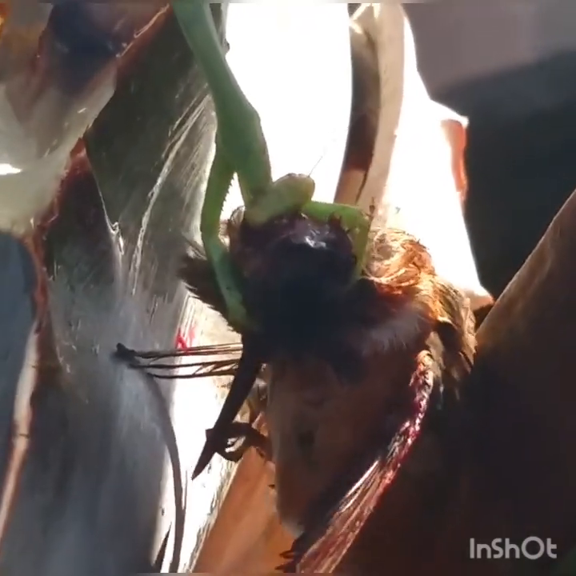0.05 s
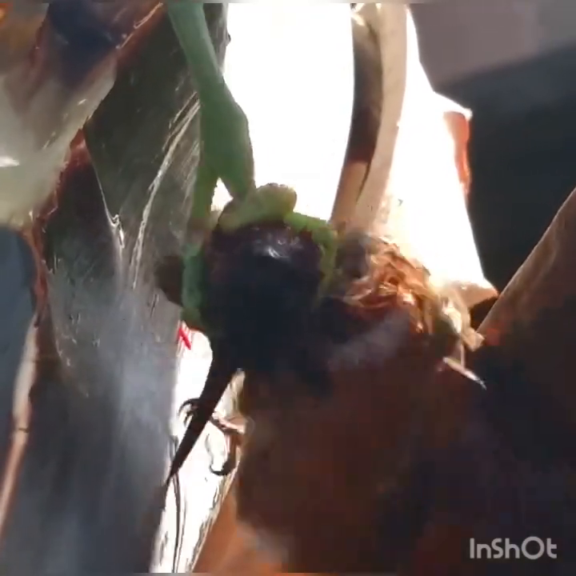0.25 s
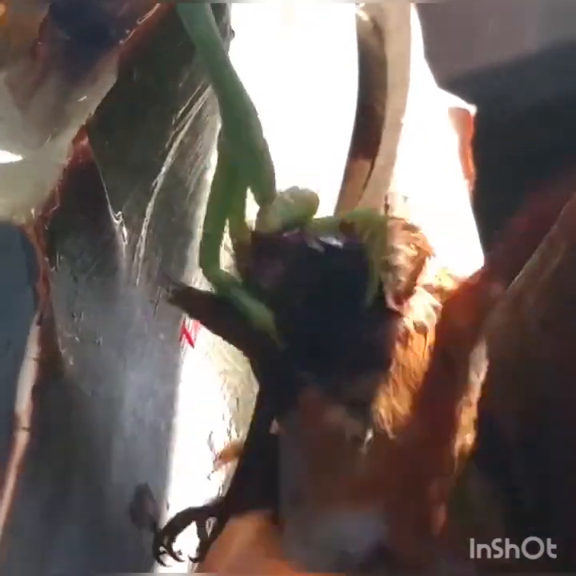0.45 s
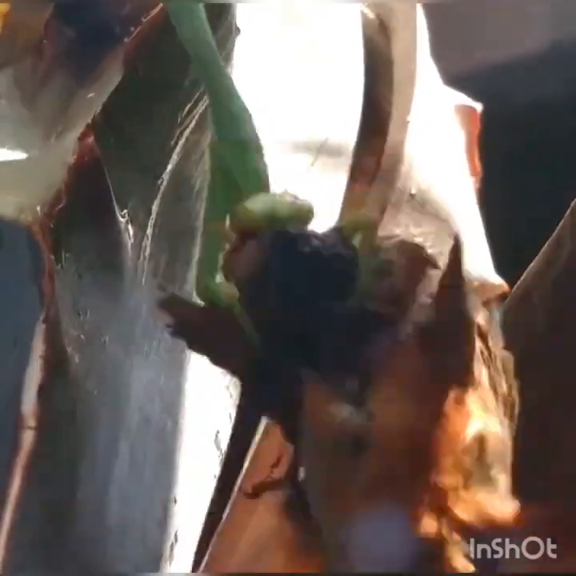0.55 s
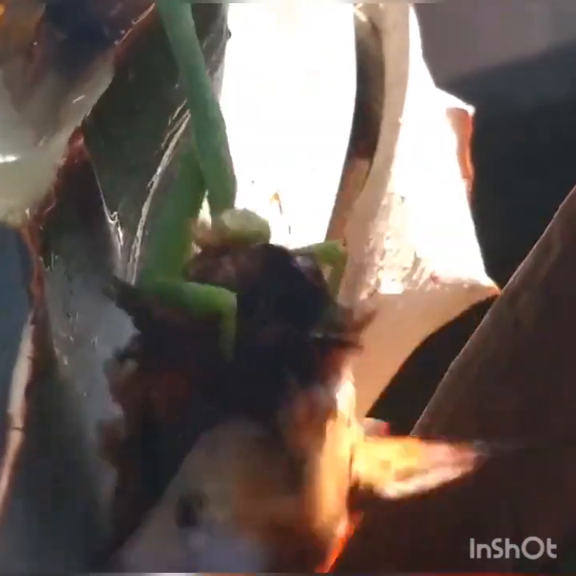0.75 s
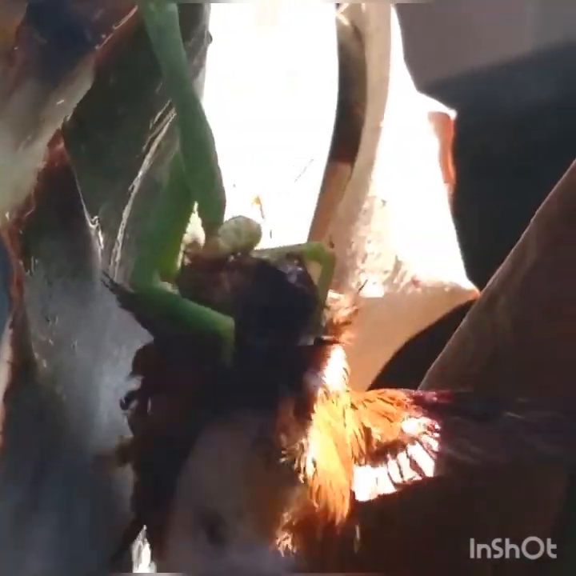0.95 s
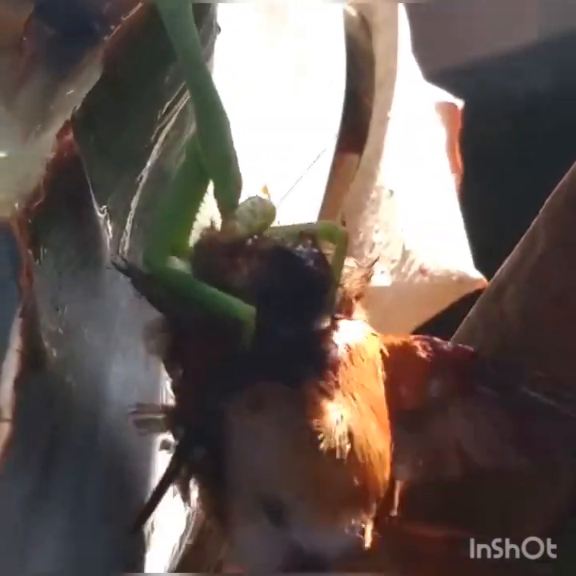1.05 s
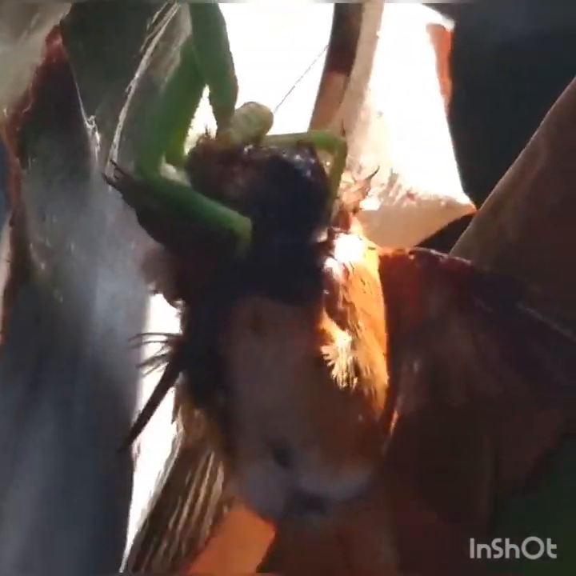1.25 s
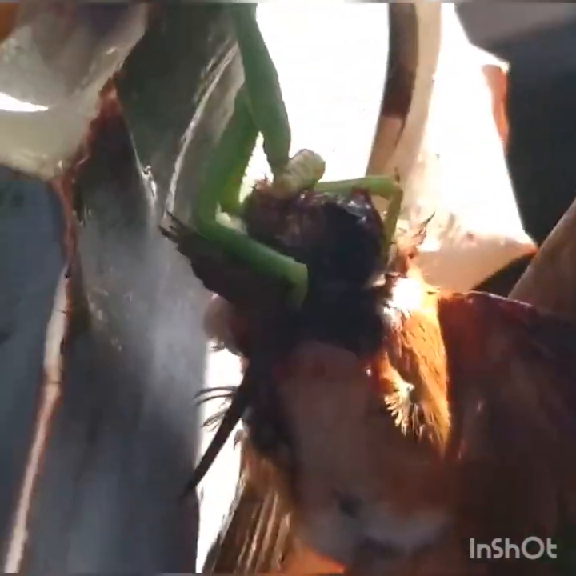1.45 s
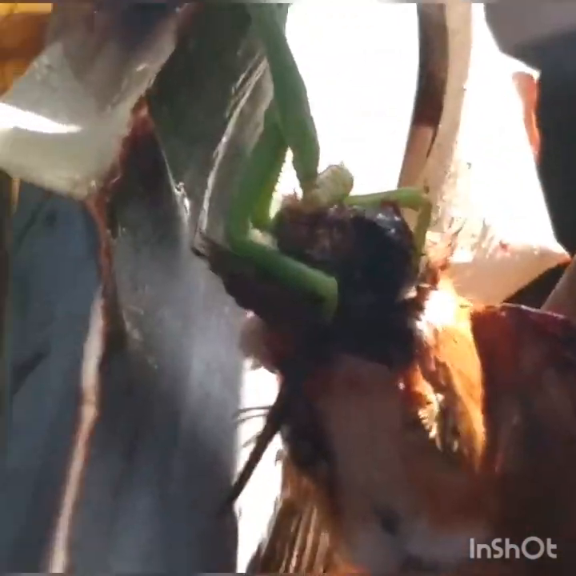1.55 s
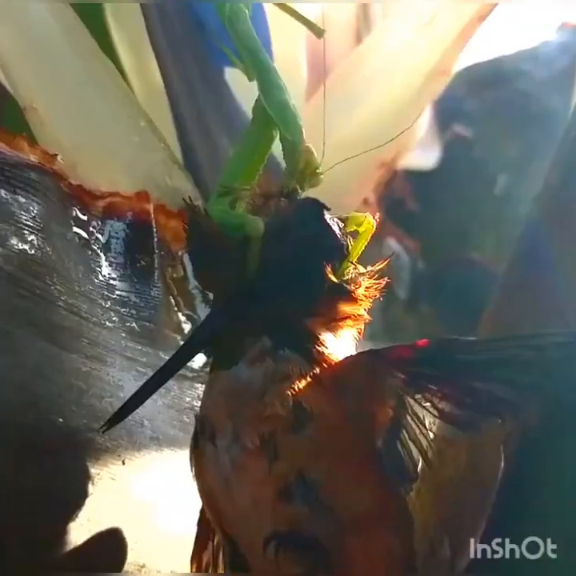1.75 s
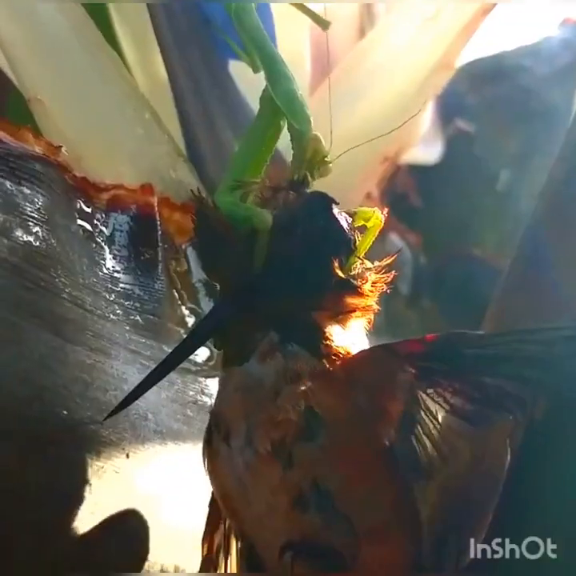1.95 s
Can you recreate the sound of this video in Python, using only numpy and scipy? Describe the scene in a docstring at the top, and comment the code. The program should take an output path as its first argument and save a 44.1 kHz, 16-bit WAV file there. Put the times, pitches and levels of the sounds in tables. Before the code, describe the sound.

Close up in a garden, wings beat against a plant in a rattling burst, and the struggling bird squeals once. After a pause come a few small leaf taps and a brief scrape, with faint traffic and birdsong far behind.

```python
"""In a garden, close by, a small bird held by a mantis thrashes its wings against stiff leaves.
Feathers slap, snap and rustle, the leaves knock back, the wingbeats push air, and the bird squeals once.
Then it goes still and a leaf ticks a few times as clicks run along it, with a soft rub and a scrape.
Behind are outdoor air, far traffic, a low hum, a thin whine and a distant songbird."""
import sys
import numpy as np
from scipy import signal
from scipy.fft import rfft, irfft
from scipy.io import wavfile

SR = 44100
rng = np.random.default_rng(int(sys.argv[2]) if len(sys.argv) > 2 else 0)


def unload_wav(signal):
    """Save mono or channel-first audio to the path in sys.argv[1] as 16-bit WAV at rate SR, clipped to [-1, 1]."""
    wavfile.write(
        sys.argv[1],
        SR,
        np.round(np.clip(np.atleast_2d(signal).T, -1, 1) * 32767).astype(np.int16),
    )


N = 88200
TIME_S = np.arange(N) / SR
HIT_SIZE, HIT_LEAD = 2048, 512  # samples: a hit's buffer, and the lead-in to its peak


def from_db(db):
    """Decibels to gain."""
    return 10 ** (np.asarray(db) / 20)


def unit_rms(x):
    """Scale to unit rms."""
    return x / np.sqrt(np.mean(x ** 2) + 1e-20)


def curve(rows, column=1):
    """One column of a breakpoint curve at every sample."""
    rows = np.array(rows)
    return np.interp(TIME_S, rows[:, 0], rows[:, column])


def gesture(rows, column=1):
    """Gain from a dB curve, silent outside it."""
    return from_db(curve(rows, column)) * (TIME_S > rows[0][0]) * (TIME_S < rows[-1][0])


def bins(size):
    """Frequencies of a spectrum, floored at 1 Hz."""
    return np.maximum(np.fft.rfftfreq(size, 1 / SR), 1)


def at_hz(points, hz):
    """Read a table on a log-frequency axis."""
    points = np.array(points)
    return np.interp(np.log(hz), np.log(points[:, 0]), points[:, 1])


def colour(x, eq, tilt=0):
    """Minimum-phase EQ with a tilt in dB per octave, rolling off below its first point."""
    size = x.shape[-1]
    hz, lowest_hz = bins(size), eq[0][0]
    octaves = np.log2(np.maximum(hz, lowest_hz) / 1000)
    low_cut = np.minimum(hz / lowest_hz + .01, 1)
    gain = from_db(at_hz(eq, hz) + tilt * octaves) * low_cut
    cepstrum = irfft(np.log(gain), size)
    cepstrum[1:size // 2] *= 2  # folded so that ringing follows the attack
    cepstrum[size // 2 + 1:] = 0
    return irfft(rfft(x) * np.exp(rfft(cepstrum)), size)


def drift(rate_hz):
    """Random wander with unit spread, mostly slower than the given rate."""
    return unit_rms(irfft(rfft(rng.standard_normal(N)) / (1 + (bins(N) / rate_hz) ** 2), N))


def stereo(pair, width):
    """Mid and side to left and right, the side scaled by a width table."""
    mid, side = pair
    side = irfft(rfft(side) * at_hz(width, bins(len(mid))), len(mid))
    return np.array([mid + side, mid - side])


def noise(eq, width):
    """Smooth stereo noise of a given colour and width."""
    return unit_rms(stereo(colour(rng.standard_normal((2, N)), eq), width))


def place(out, start_s, hit, level_db):
    """Mix in a hit with the energy of 4 ms at the given level."""
    start = int(start_s * SR) - HIT_LEAD
    energy = np.mean(np.sum(hit ** 2, axis=-1))
    out[:, start:start + HIT_SIZE] += hit * from_db(level_db) * np.sqrt(.004 * SR / energy)


# stereo spread of the ambience: freq_hz, side_over_mid
AIR_WIDTH = [(200, .004), (450, 0.052), (1000, 0.068), (1800, 0.2), (4000, 0.6), (8000, .85), (15000, 0.58)]
# tone of the air bed and of the wind puff: freq_hz, gain_db
AIR_EQ = [(15, -64), (25, -36.5), (43, -14), (72, -8.5), (145, 2), (175, -7), (242, -6.5), (326, -11.5),
          (384, -14.5), (624, -20), (863, -17.5), (1160, -22.5), (2350, -32), (3920, -34.5), (5730, -38.5),
          (14800, -39), (16000, -45.5)]
PUFF_EQ = [(25, -4.5), (65, 17), (110, -17), (300, -62)]
# their fader rides: time_s, level_db
AIR_LEVEL = [(0, -61.5), (.9, -61.5), (1.4, -62.5), (1.65, -61.5), (1.78, -64), (2, -63)]
PUFF_LEVEL = [(1.29, -68), (1.335, -57.5), (1.375, -87.5)]

def outdoor_air():
    """A bed of open air with one low puff of wind."""
    bed = noise(AIR_EQ, AIR_WIDTH) * from_db(curve(AIR_LEVEL))
    return bed + noise(PUFF_EQ, AIR_WIDTH) * gesture(PUFF_LEVEL)


# tone of far tyres: freq_hz, gain_db
TRAFFIC_EQ = [(300, -13.5), (700, -10), (870, 2.5), (1100, -17.5), (2000, -27), (5000, -52)]
# traffic swells: time_s, level_db
TRAFFIC_LEVEL = [(0, -74), (.6, -60.5), (1.0, -67.5), (1.16, -63), (1.48, -65.5), (1.65, -70), (1.8, -86),
                 (2, -90)]

def traffic():
    """Far tyre noise swells and fades."""
    return noise(TRAFFIC_EQ, AIR_WIDTH) * from_db(curve(TRAFFIC_LEVEL))


# fader ride of the hum: time_s, level_db
HUM_LEVEL = [(0, -64), (.2, -63.5), (1.1, -66.5), (1.5, -64), (1.75, -81), (2, -70.5)]

def hum(pitch_hz=77.2, third_db=-2.5):
    """A low tone and its third harmonic, each wavering in level and phase."""
    tone = np.zeros(N)
    for harmonic, db in ((1, 0), (3, third_db)):
        gain = from_db(db + 2.5 * drift(5))
        tone += gain * np.sin(2 * np.pi * harmonic * pitch_hz * TIME_S + .5 * drift(3))
    return tone * from_db(curve(HUM_LEVEL))


# fader ride of the whine: time_s, level_db
WHINE_LEVEL = [(.7, -92), (.83, -77), (1.0, -81.5), (1.17, -76), (1.22, -82), (1.31, -86), (1.38, -86)]

def whine(pitch_hz=4440):
    """One thin, unsteady high tone."""
    gain = gesture(WHINE_LEVEL) * from_db(2 * drift(13))
    return gain * np.sin(2 * np.pi * pitch_hz * TIME_S + .45 * drift(24))


# song notes: start_s, length_s, start_hz, end_hz, arch_hz, prefader_db
CHIRPS = [(1.027, 0.034, 3810, 3700, 140, -66.5), (1.483, 0.053, 4200, 3750, 197, -71),
          (1.57, 0.038, 3880, 3200, 2.6, -72.5), (1.68, 0.016, 4200, 5020, 0.52, -68.5),
          (1.694, 0.029, 4090, 3910, 7.5, -69.5), (1.757, 0.06, 2900, 3216, 89, -68.5),
          (1.875, 0.046, 3196, 3300, 840, -69.5)]

def songbird(warble_hz=110):
    """Faint whistles that glide along an arch with a fast random warble."""
    out = np.zeros(N)
    for start_s, length_s, start_hz, end_hz, arch_hz, db in CHIRPS:
        progress = np.clip((TIME_S - start_s) / length_s, 0, 1)
        arch = np.sin(np.pi * progress)
        hz = start_hz + (end_hz - start_hz) * progress + arch_hz * arch + warble_hz * drift(337)
        out += from_db(db) * np.sqrt(2 * np.abs(arch)) * np.sin(2 * np.pi * np.cumsum(hz) / SR)
    return out


def garden_reverb(x, t60_s=.45, predelay_s=.004, lowpass_hz=4000):
    """Scattered, dulled reflections from foliage and walls."""
    t = np.arange(SR // 2) / SR
    tail = stereo(rng.standard_normal((2, len(t))), AIR_WIDTH)
    tail *= from_db(-60 * t / t60_s) * (t > predelay_s)
    tail /= np.sqrt(np.sum(tail ** 2) / 2)
    tail = signal.sosfilt(signal.butter(1, lowpass_hz, fs=SR, output="sos"), tail)
    return signal.fftconvolve(x * np.ones((2, 1)), tail, axes=1)[:, :N]


# microphone channel imbalance on the ticks and the squeal: freq_hz, side_over_mid
MIC_IMBALANCE = [(500, .02), (1200, 0.048), (1900, 0.2), (3000, 0.087), (6000, .05)]

def mic_imbalance(x):
    """Unequal microphone channels make the left louder, mostly near 1.9 kHz."""
    return stereo((x, x), MIC_IMBALANCE)


# stereo spread of the close textures: freq_hz, side_over_mid
GRAIN_WIDTH = [(500, .03), (1300, .06), (1850, 0.13), (2700, .07), (4300, 0.11), (7000, .3), (13000, 0.47)]

def grains(size, spread_db=7):
    """Dense tiny clicks of uneven strength as barbs, leaf or claw slip."""
    clicks = rng.standard_normal((2, size))
    strength = from_db(spread_db * np.clip(rng.standard_normal(size), -2, 2))
    return stereo(clicks * strength, GRAIN_WIDTH)


# tone of the claw and of the shifting leaf: freq_hz, gain_db
SCRAPE_EQ = [(800, -9.5), (2000, -2), (3000, -4), (5000, -7), (7000, -22.5), (16000, -22)]
RUB_EQ = [(600, -11), (1000, 6), (1350, -6.5), (1850, 0.5), (2600, -15), (3800, -6), (6000, -22),
          (12000, -28)]
# their envelopes: time_s, level_db
SCRAPE_LEVEL = [(1.419, -55), (1.423, -53.5), (1.429, -50.5), (1.436, -61.5), (1.452, -89)]
RUB_LEVEL = [(1.22, -77), (1.262, -66), (1.305, -65), (1.35, -90), (1.39, -70), (1.425, -62), (1.47, -65.5),
             (1.53, -79), (1.62, -72), (1.72, -80)]

def leaf_friction():
    """A claw scrapes on after one tick, and the leaf rubs softly as it shifts."""
    scrape = unit_rms(colour(grains(N), SCRAPE_EQ)) * gesture(SCRAPE_LEVEL)
    rub = unit_rms(colour(grains(N), RUB_EQ)) * gesture(RUB_LEVEL)
    return scrape + rub


# tick cues: start_s, level_db, tilt_db_per_octave, edge_echo_s
TICKS = [(1.2533, -36.5, 0, .00069), (1.2871, -54, 3, 0.00049), (1.4184, -38, 2, 0.000777),
         (1.596, -63, 16.5, 0.00027)]
# tone of a tick: freq_hz, gain_db
TICK_EQ = [(300, -14.5), (600, -12.5), (920, 0), (1330, -6), (1950, 3), (2700, -4), (3600, -8),
           (5500, -23.5), (8000, -38), (16000, -64)]

def leaf_ticks(travel_at_1khz_s=.001304, front_hz=4968, echo_gain=.75):
    """A click runs along the leaf as a bending wave, highs first, and returns inverted from the edge."""
    out, hz = np.zeros((2, N)), bins(HIT_SIZE)
    lag_s = travel_at_1khz_s * np.maximum(np.sqrt(1000 / hz) - np.sqrt(1000 / front_hz), 0)
    wave = np.exp(-2j * np.pi * np.cumsum(lag_s + HIT_LEAD / SR) * SR / HIT_SIZE)
    for start_s, level_db, tilt, echo_s in TICKS:
        edge_comb = 1 - echo_gain * np.exp(-2j * np.pi * hz * echo_s)
        tick = colour(irfft(wave * edge_comb), TICK_EQ, tilt)
        place(out, start_s, mic_imbalance(tick), level_db)
    return out


# contour of the cry: time_s, pitch_hz, level_db
SQUEAL = [(.258, 2150, -58), (.262, 2060, -46), (.266, 2000, -34.5), (.271, 1950, -31), (.277, 2130, -33),
          (.281, 2050, -32.5), (.287, 2230, -32.5), (.296, 1940, -30.5), (.302, 1900, -31),
          (.306, 1900, -37), (.311, 2000, -30.5), (.319, 1900, -28.5), (.326, 1880, -33),
          (.343, 1860, -34.5), (.35, 1860, -40), (.364, 1850, -41), (.37, 1850, -55)]
# its harmonics, from the fundamental up: gain_db
SQUEAL_HARMONICS = [-17, -4.5, -16, -19, -28, -30]
# tone of its hiss: freq_hz, gain_db
HISS_EQ = [(3200, -31), (4500, -0.5), (8000, -3), (9500, -7.5), (11000, -1.5), (15000, -11)]

def squeal(jitter=.023, flutter_db=3, rasp=.35, hiss_db=-15):
    """A raspy, wavering, falling cry, strongest in its second harmonic, with hiss pulsing at its pitch."""
    pitch_hz = curve(SQUEAL) * (1 + jitter * drift(500))
    phase = 2 * np.pi * np.cumsum(pitch_hz) / SR
    tone = sum(from_db(db + flutter_db * drift(235)) * np.sin(harmonic * phase)
               for harmonic, db in enumerate(SQUEAL_HARMONICS, 1))
    hiss = unit_rms(colour(rng.standard_normal(N) * (1 + np.cos(phase)), HISS_EQ))
    voice = unit_rms(tone * (1 + rasp * drift(600)))
    return (voice + from_db(hiss_db) * hiss) * gesture(SQUEAL, column=2)


# tone of the wing whoosh: freq_hz, gain_db
DRAUGHT_EQ = [(25, -19), (70, -7), (130, -2.5), (200, 3.5), (330, -6.5), (600, -10), (1500, -15),
              (4000, -56.5)]
# its spread: freq_hz, side_over_mid
DRAUGHT_WIDTH = [(40, .12), (400, .07)]
# its envelope: time_s, level_db
DRAUGHT_LEVEL = [(.22, -76.5), (.29, -57), (.35, -50.5), (.44, -53.5), (.5, -52.5), (.57, -57), (.625, -45),
                 (.68, -52.5), (.73, -53.5), (.81, -64)]

def wing_draught():
    """A low whoosh of air pushed by the wings."""
    return noise(DRAUGHT_EQ, DRAUGHT_WIDTH) * gesture(DRAUGHT_LEVEL)


# tone of rubbing feathers: freq_hz, gain_db
RUSTLE_EQ = [(400, -26.5), (950, 8), (1350, -9.5), (1900, 0.5), (2600, -6), (3800, 5.5), (5500, 1),
             (7000, -1.5), (9000, -2), (16000, -3)]
# their envelope: time_s, level_db
RUSTLE_LEVEL = [(.2, -72.5), (.245, -69.5), (.262, -50), (.29, -53.5), (.3, -36), (.34, -36.5), (.39, -41),
                (.452, -40.5), (.468, -55), (.51, -47), (.526, -53), (.541, -36), (.555, -47), (.572, -55),
                (.605, -39.5), (.632, -40.5), (.668, -47), (.69, -66.5), (.702, -45.5), (.73, -56),
                (.777, -53), (.82, -71.5), (.9, -92)]

def feather_rustle(clump_db=2.5, crackle_db=3):
    """Feathers rub between the slaps, in clumps with a finer crackle on top."""
    friction = grains(N) * from_db(clump_db * drift(200) + crackle_db * drift(1500))
    return unit_rms(colour(friction, RUSTLE_EQ)) * gesture(RUSTLE_LEVEL)


def contact(rise_s, decay_s):
    """One contact: a burst of grains that rises and dies exponentially."""
    t = (np.arange(HIT_SIZE) - HIT_LEAD) / SR
    return grains(HIT_SIZE) * np.exp(-np.maximum(-t / rise_s, t / decay_s))


# flick cues: start_s, level_db, decay_s
FLICKS = [(0.2134, -61, 0.0013), (0.2477, -31.5, 0.0015), (0.35, -32, 0.0012), (0.3575, -35.5, .0014),
          (0.37, -36.5, 0.00086), (0.5334, -36, .005), (0.6563, -33.5, .0017), (0.6604, -36, .001)]
# tone of a feather tip: freq_hz, gain_db
FLICK_EQ = [(1500, -42), (3000, -38.5), (4300, -9), (5400, -7), (6900, 3.5), (8500, -6.5), (11500, -11),
            (15000, -33.5)]

def feather_flicks(rise_share=.35):
    """Feather tips flick lightly past, with no knock."""
    out = np.zeros((2, N))
    for start_s, level_db, decay_s in FLICKS:
        place(out, start_s, colour(contact(rise_share * decay_s, decay_s), FLICK_EQ), level_db)
    return out


# body of the struck leaf: freq_hz, gain_db
KNOCK_EQ = [(200, -9.5), (500, -13.5), (820, 0.5), (1050, 2.5), (1350, -8), (1800, 3), (2500, -10.5),
            (4000, -8.5)]

def leaf_knock(blow_decay_s=0):
    """The leaf's short, dull answer, dying a little slower than the blow."""
    return colour(contact(rise_s=.00083, decay_s=blow_decay_s + .002), KNOCK_EQ)


# snap cues: start_s, level_db, pitch_hz, knock_db
SNAPS = [(0.329, -21.5, 9000, -35), (.3727, -29, 5030, -33.5), (0.3773, -32, 10880, -42.5),
         (0.3834, -37.5, 13060, -40.5), (0.6188, -27.5, 6940, -37.5), (.708, -26.5, 11350, -32),
         (.7481, -35.5, 7500, -61)]
# tone of a snap: pitch_multiple, gain_db
SNAP_EQ = [(.12, -21.5), (.25, -14.5), (.42, -5.5), (.72, -8.5), (1, 4), (1.35, -3.5), (2, -22.5)]

def quill_snaps(scratch_db=-7, scratch_decay_s=.0006):
    """A quill snaps past a leaf edge: a knock, a broad crack and a brief scratch of slipping barbs."""
    out = np.zeros((2, N))
    for start_s, level_db, pitch_hz, knock_db in SNAPS:
        place(out, start_s, leaf_knock(), knock_db)
        snap = contact(1 / SR, scratch_decay_s)
        snap *= from_db(scratch_db) / np.sqrt(np.sum(snap ** 2) / 2)
        snap[:, HIT_LEAD] = 1  # the crack, at the head of the scratch
        eq = [(multiple * pitch_hz, db) for multiple, db in SNAP_EQ]
        place(out, start_s, colour(snap, eq), level_db)
    return out


def feather_ring(x, hz, boost_db=6.5, bandwidth_hz=600):
    """The struck feather's own resonance lifts a narrow band."""
    radius = np.exp(-np.pi * bandwidth_hz / SR)
    feedback = [1, -2 * radius * np.cos(2 * np.pi * hz / SR), radius ** 2]
    band = signal.lfilter([1, 0, -1], feedback, x) * (1 - radius ** 2) / 2
    return x + (from_db(boost_db) - 1) * band


# slap cues: start_s, level_db, decay_s, tilt_db_per_octave, knock_db, ring_hz
SLAPS = [(.298, -30.5, .0014, 6, -47.5, 7100), (0.3038, -33.5, .0012, 6, -40.5, 7250),
         (0.3106, -31.5, .0014, 7.5, -50.5, 7000), (0.3297, -28, .0008, -2.5, -44.5, 6500),
         (.3319, -31.5, .001, 1.5, -38, 6660), (.3515, -23.5, .001, -3.5, -37.5, 6700),
         (0.3731, -27, .0014, -3.5, -32.5, 6800), (0.3796, -34.5, .0009, -3.5, -34, 7200),
         (.396, -33.5, .0022, 0.5, -37, 6800), (0.4036, -35.5, .0012, -2, -41, 6700),
         (.4232, -33, .0011, -3.5, -39.5, 6470), (0.4315, -30.5, .002, -0.5, -42.5, 5000),
         (.4451, -29, .0007, 1.5, -30.5, 7180), (0.479, -42.5, .0012, -0.5, -37, 6770),
         (0.4943, -37.5, .0012, -4.5, -51, 4800), (.5454, -32.5, .0004, 2.5, -55, 7200),
         (0.5485, -33, .0018, 2.5, -52.5, 4250), (0.5799, -38, .0022, -6, -36, 4080),
         (.586, -28, .0014, 11, -42, 7360), (0.5891, -30, .0022, -2, -34, 5030),
         (.6141, -30.5, .0014, 1, -32.5, 4900), (.6163, -26, .001, -4, -33.5, 4800),
         (0.6196, -25.5, .0022, -5, -31.5, 4770), (.6386, -29, .0022, -4, -38, 7300),
         (0.6421, -38, .0012, -4, -36.5, 6700), (0.659, -25.5, .0014, -0.5, -32.5, 4900),
         (0.7118, -32.5, .0006, 0, -41, 7310), (0.7484, -34.5, .0007, -0.5, -42, 7330),
         (0.7511, -37, .001, 1.5, -43.5, 7330)]
# tone of slapping feathers: freq_hz, gain_db
SLAP_EQ = [(1300, -20.5), (1900, -19), (2600, -11.5), (3700, -1), (4800, -2.5), (5700, -7), (6900, 2),
           (8500, -7), (12000, -10), (16000, -31.5)]

def wing_slaps(rise_share=.35):
    """Feathers slap the stiff leaves: each blow is a bright burst over a leaf knock."""
    out = np.zeros((2, N))
    for start_s, level_db, decay_s, tilt, knock_db, ring_hz in SLAPS:
        burst = colour(contact(rise_share * decay_s, decay_s), SLAP_EQ, tilt)
        place(out, start_s, feather_ring(burst, ring_hz), level_db)
        place(out, start_s, leaf_knock(decay_s), knock_db)
    return out


def scene(near_reverb_db=-22.5, song_direct_db=-4, song_reverb_db=-5):
    """The struggle up front and almost dry, the songbird deep in reverb, the ambience underneath."""
    wings = wing_slaps() + feather_flicks() + quill_snaps() + feather_rustle() + wing_draught()
    near = wings + mic_imbalance(squeal()) + leaf_ticks() + leaf_friction()
    song = songbird()
    near += from_db(near_reverb_db) * garden_reverb(near)
    far = from_db(song_direct_db) * song + from_db(song_reverb_db) * garden_reverb(song)
    return near + far + hum() + whine() + outdoor_air() + traffic()


def record(dry):
    """A steep low-pass takes off the top above 16.2 kHz."""
    lowpass = signal.firwin(201, 16200, fs=SR, window="blackman")
    return signal.fftconvolve(dry, lowpass[None], "same", axes=1)


dry = scene()
out = record(dry)
unload_wav(out)
```